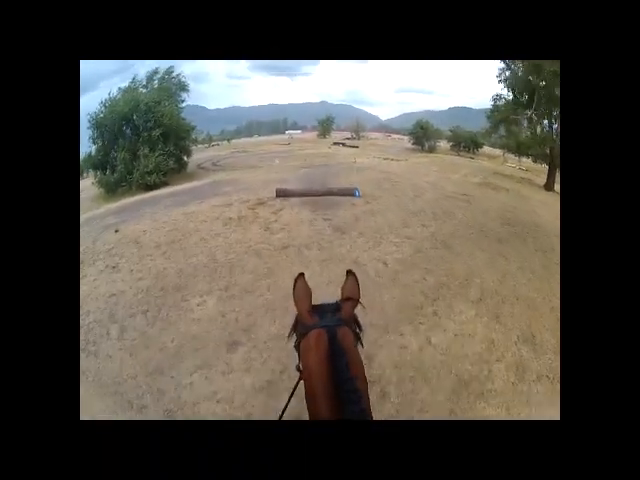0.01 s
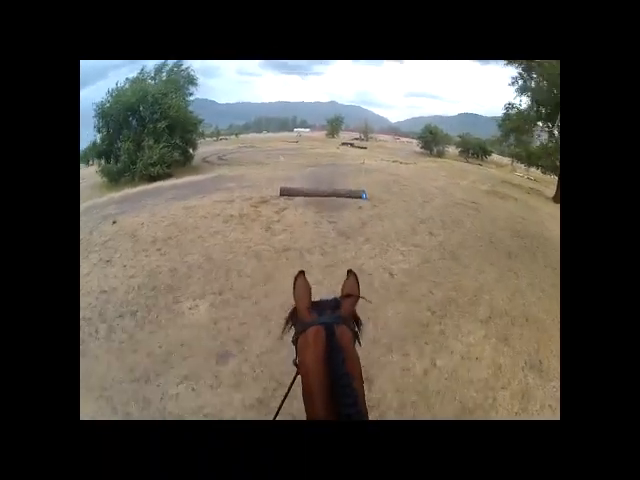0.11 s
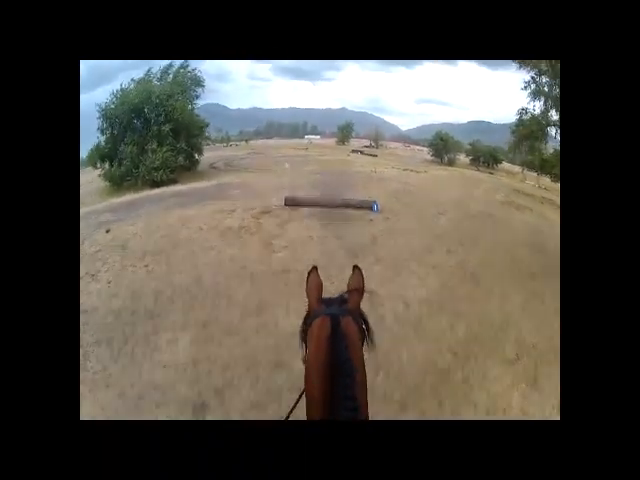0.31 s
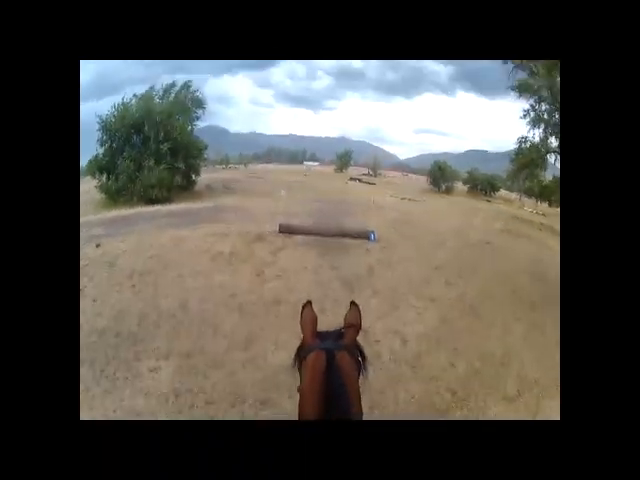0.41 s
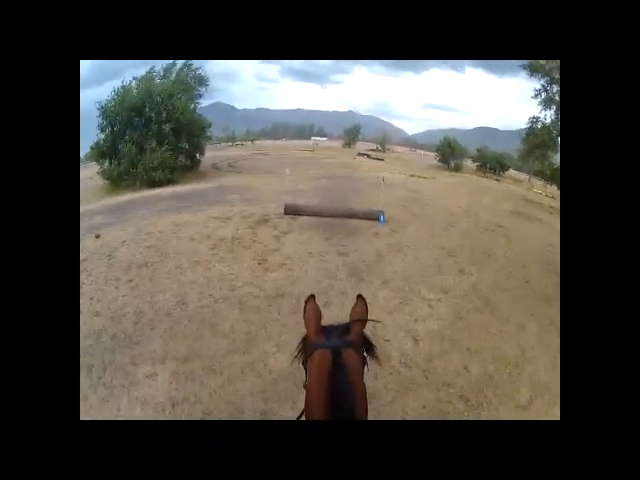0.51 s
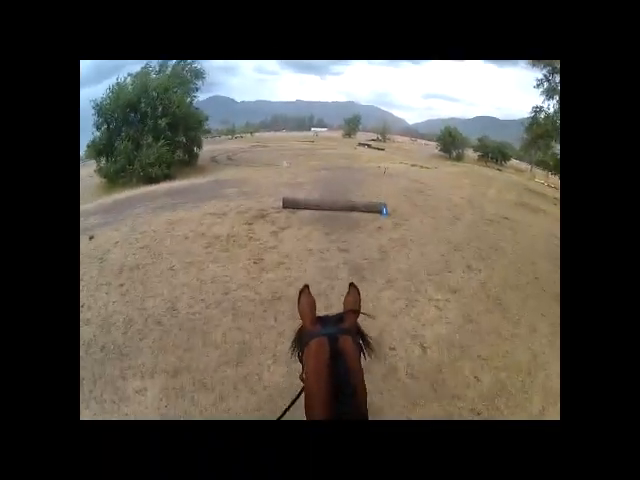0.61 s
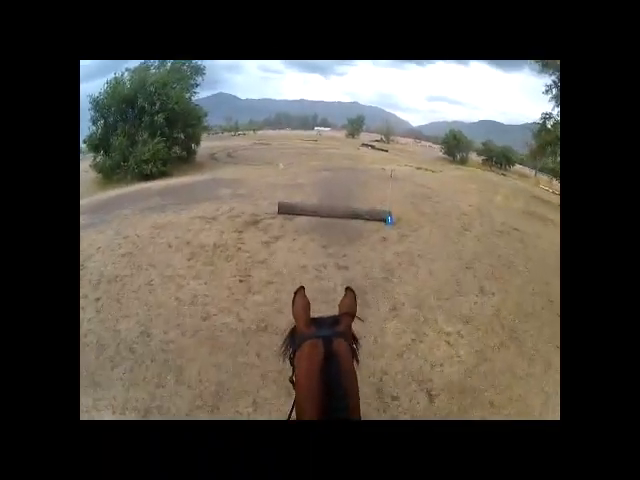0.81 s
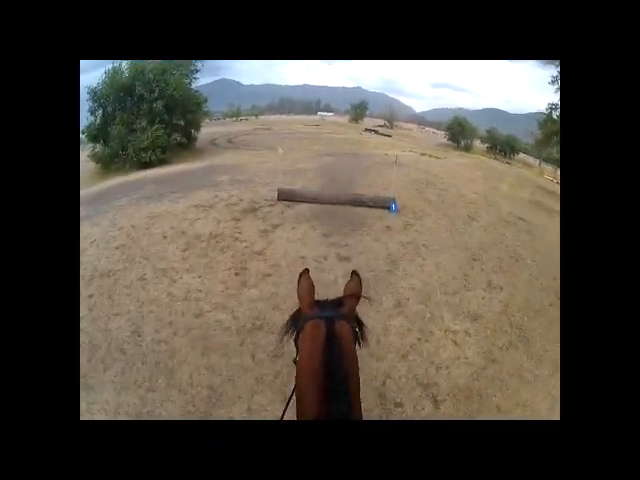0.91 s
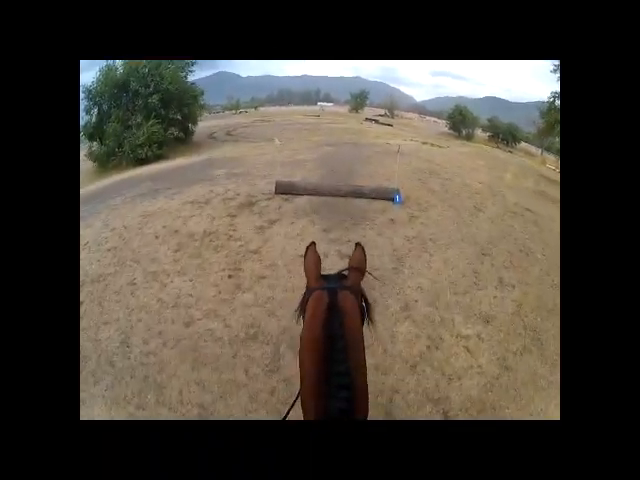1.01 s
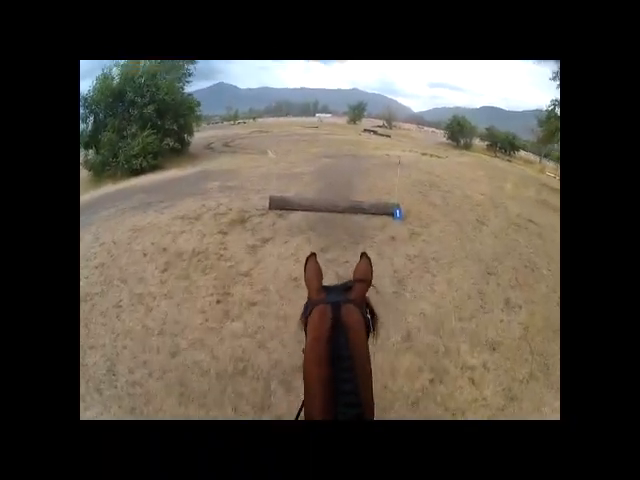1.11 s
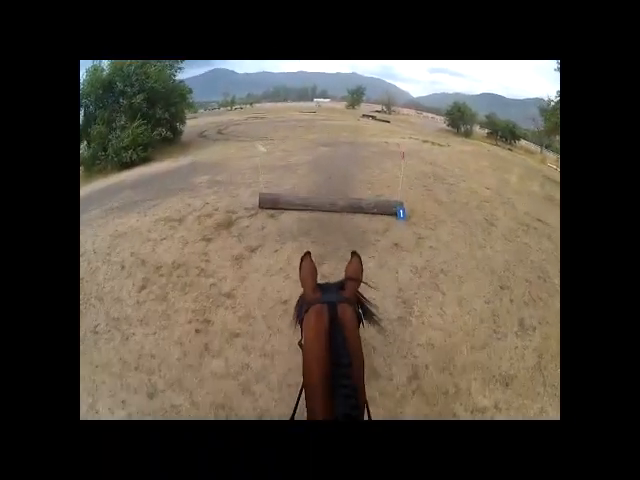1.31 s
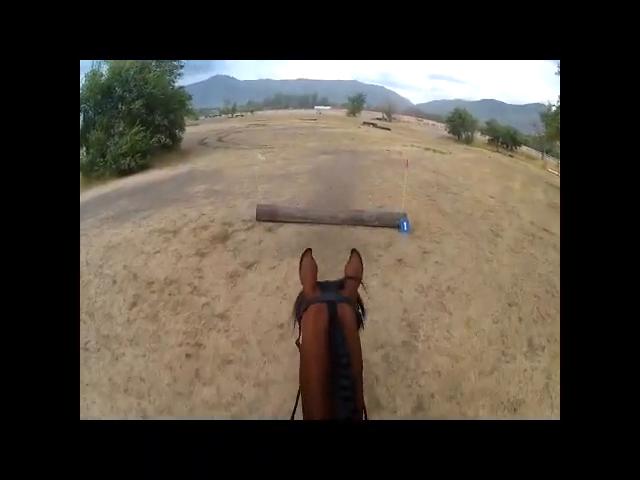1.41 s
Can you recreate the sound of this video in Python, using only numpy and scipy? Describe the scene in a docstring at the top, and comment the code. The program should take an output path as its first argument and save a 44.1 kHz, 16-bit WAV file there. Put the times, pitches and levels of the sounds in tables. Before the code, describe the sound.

From a microphone on the rider, a horse canters across an open dry field; two bursts of hard, woody hoofbeats with a soft step between, dry grit crunching, air heaving at the microphone, low wind and faint hiss.

```python
"""A horse canters over hard dry ground, heard from the saddle: two strides, with a softer footfall between.
Each stride is a cluster of hard, hollow knocks (struck damped modes) over dull thuds (damped low swings),
with short gritty scuffs of grainy friction noise.
Air heaves at the microphone as slow pressure pulses with every stride, over a low rumble of wind
and a faint hiss with a whine in it, all made from coloured noise."""
import sys
import numpy as np
from scipy import signal
from scipy.io import wavfile
from scipy.ndimage import uniform_filter1d

SR = 44100
rng = np.random.default_rng(int(sys.argv[2]) if len(sys.argv) > 2 else 0)


def master(y):
    """Save y as 16-bit WAV."""
    cut = np.clip(np.atleast_2d(y).T, -1, 1)
    pcm = np.round(cut * 32767)  # scale
    wavfile.write(sys.argv[1], SR, pcm.astype(np.int16))


N = 63945

# wind rumble over time: (time [s], level [dB])
WIND_LEVEL = [(0, -36), (.056, -31.5), (.19, -44), (.25, -39), (.33, -38), (.46, -30), (.53, -41),
              (.62, -44), (.72, -36), (.83, -33), (.93, -46), (1.0, -47), (1.1, -34), (1.2, -33),
              (1.27, -39), (1.37, -48), (1.45, -37)]
# relative spectral density of the rumble: (frequency [Hz], density [dB per Hz])
RUMBLE_COLOUR = [(10, -24), (22, -3.5), (33, -1), (47, -8), (65, -17.5), (100, -33.5), (200, -39.5),
                 (500, -62), (1500, -100)]
WIND_FADE_S = 0.012
# relative spectral density of the steady outdoor hiss: (frequency [Hz], density [dB per Hz])
HISS_COLOUR = [(30, 5), (120, 1.5), (250, -1.5), (400, -7), (700, -14.5), (1300, -18.5), (2500, -21.5),
               (4500, -25), (7000, -29), (10000, -33.5), (12500, -39)]
HISS_DB = -58.5
# narrow noise bands of the whine: (centre [Hz], width [Hz], level [dB])
WHINE_BANDS = [(5050, 120, -80.5), (6950, 99, -82)]

# gritty scuffs: (centre [s], relative level [dB], half length [s])
SCUFFS = [(0.1, -66.5, 0.042), (0.265, -44.5, 0.0038), (0.349, -54, 0.019), (0.394, -40.5, 0.0035),
          (0.422, -46.5, 0.0052), (.431, -37.5, 0.0065), (0.444, -47.5, 0.0056), (0.466, -63.5, 0.056),
          (0.66, -66.5, 0.018), (.732, -56, 0.017), (0.789, -63, 0.019), (0.816, -60.5, 0.0045),
          (1.052, -57, 0.011), (1.074, -57, 0.0025), (1.101, -55.5, 0.017), (1.144, -50.5, 0.011),
          (1.186, -68, 0.033), (1.228, -56.5, 0.002), (1.275, -68, 0.011)]
# relative spectral density of scuff noise: (frequency [Hz], density [dB per Hz])
GRIT_COLOUR = [(250, -19), (500, -3), (950, 5), (1500, -6.5), (2200, 2.5), (3400, -8), (5000, -20.5),
               (7000, -25.5), (9600, -12), (11500, -17), (12600, -27.5)]
GRAIN_DB, GRAIN_S = 4, 0.0005  # rms of the level flicker, and its smoothing time
CRUNCH_DB, CRUNCH_RISE_S, CRUNCH_DECAY_S = -19, 0.0005, 0.0028  # level relative to its knock

# dull thuds: (time [s], relative level [dB], pitch [Hz], 60 dB decay time [s], rise time [s])
THUDS = [(0.247, -2.5, 108.4, 0.017, 0.00071), (0.2626, -12, 114.7, 0.049, 0.00053),
         (0.34, -10, 110, 0.014, 0.00072), (.3560, -15.5, 101, 0.057, 0.0044),
         (0.3945, -15, 224, .025, .001), (0.3986, -3.5, 102, 0.042, .0006), (0.421, -3.5, 75, 0.02, .001),
         (0.4406, -2.5, 119, 0.022, 0.00017), (0.721, -26.5, 130, 0.12, 0.00042),
         (0.7332, -20, 107, 0.061, 0.00067), (1.0548, -5.5, 94.3, 0.028, 0.0008),
         (1.098, -15, 200, 0.017, 0.0007), (1.102, -12, 114, 0.054, 0.00097),
         (1.152, -23.5, 161.5, 0.039, 0.0013), (1.158, -15.5, 70.6, 0.041, 0.002)]
THUD_TOP_HZ = 356.4
THUD_ROUGH_DB, ROUGH_REACH = -11, 2.14  # rms level; upper limit as a multiple of the pitch

# hard knocks: (time [s], relative level [dB], pitch [ratio], brightness [dB per octave],
#               ring length [ratio], level of the top modes [dB])
KNOCKS = [(0.2472, -6.5, 0.95, 0, 0.74, -0.5), (0.2626, -16, 0.97, -2, 0.78, -0.8),
          (.3390, -20, 0.98, -8, 1, -2.5), (0.35, -37, 1.0, -4.5, 2.5, 0),
          (0.393, -17.5, 1.007, 0.5, 0.83, 1), (0.3964, -24.5, 1.0, 0.5, 1.82, 0.5),
          (0.424, -25.5, 1.08, -2, 1.6, -7), (0.429, -17.5, 0.9, -1, 1.47, -4),
          (.4385, -16.5, 0.75, -34, 0.35, -25), (0.442, -27.5, 1.146, -2, 0.78, 4),
          (0.721, -37, 0.85, -8, 0.59, -4), (0.732, -38, 1.047, -16, 1.6, 1),
          (1.0541, -11, 1.007, -1.8, 1.265, 0.5), (1.0991, -20, 1.158, 1.5, 1.14, 3.5)]
# hollow modes of a knock, before its ratios: (frequency [Hz], relative level [dB], time to peak [s])
KNOCK_MODES = [(757, -7, .00106), (943, 3, .00096), (1298, -13, .0014), (1750, -9.5, .00095),
               (2567, -24, .0012), (2771, -17, .0011), (3342, -31, .0011), (3692, -27, .001),
               (4250, -38, .0007), (4850, -39, .0007), (8329, -31, .00055), (9157, -30, .0009),
               (10220, -25, .0006), (11016, -18, .001)]
MAIN_MODE_HZ = KNOCK_MODES[1][0]
TOP_MODES_HZ = 6000
AFTER_RING_HZ, AFTER_RING_DB, AFTER_RING_S = 815, -20.5, 0.0014
RATTLE_DB, RATTLE_S = -14, 0.006  # energy relative to the blow; decay time
KNOCK_DB, KNOCK_LOW_HZ = -1, 546

# air heaves: (centre [s], level [dB], pitch [Hz], half length [s])
HEAVES = [(0.376, -16, 42.7, 0.019), (0.425, -18.5, 39, 0.0076), (0.765, -36, 34.56, 0.019),
          (1.08, -15.5, 34.2, 0.021), (1.155, -23.5, 30.1, 0.036)]

# microphone response: (frequency [Hz], gain [dB])
MIC_RESPONSE = [(20, 0.5), (3800, 2), (5100, -2), (5900, -8.5), (6500, -6.5), (7300, 0.5), (8500, 2.5),
                (11400, 2), (12300, 2)]
BAND_LIMIT_HZ = 12624


def amp(db):
    """Logarithmic level: converts decibels to an amplitude ratio."""
    return 10 ** (np.asarray(db) / 20)


def unit(x):
    """Normalisation: scales a signal to an rms of 1."""
    return x / np.sqrt(np.mean(x ** 2) + 1e-20)


def add(mix, start_s, sound):
    """Superposition: adds a sound into the mix, in place, from a given time."""
    part = mix[max(round(start_s * SR), 0):][:len(sound)]
    part += sound[:len(part)]


def colour(x, points):
    """Minimum-phase filtering: the log gain fixes the phase of a causal response."""
    table_hz, table_db = np.transpose(points)
    size = 16384
    hz = abs(np.fft.fftfreq(size, 1 / SR))
    gain_db = np.interp(np.log(hz + 1), np.log(table_hz + 1), table_db)
    log_spectrum = np.conj(signal.hilbert(np.log(amp(gain_db))))
    taps = np.fft.ifft(np.exp(log_spectrum)).real[:size // 2]
    return signal.fftconvolve(x, taps)[:len(x)]


def noise(points):
    """Spectral shaping: steady white noise takes a given colour, at an rms of 1."""
    white = rng.standard_normal(N + SR)
    return unit(colour(white, points)[SR:])  # the filter settles in the dropped second


def cut(x, hz, kind, order):
    """Butterworth filtering: a high-pass or low-pass with a flat passband."""
    return signal.sosfilt(signal.butter(order, hz, kind, fs=SR, output="sos"), x)


def wind_rumble():
    """Amplitude modulation: low-frequency noise follows the wind level, faded at both ends."""
    t = np.arange(N) / SR
    level = amp(np.interp(t, *np.transpose(WIND_LEVEL)))
    fade = np.minimum(np.minimum(t, t[::-1]) / WIND_FADE_S, 1)
    return fade * level * noise(RUMBLE_COLOUR)


def hiss():
    """Stationary broadband noise: a constant spectrum falling towards the treble."""
    return amp(HISS_DB) * noise(HISS_COLOUR)


def whine():
    """Heterodyning: slow noise multiplies a sine, giving a narrow band around its frequency."""
    t = np.arange(N) / SR
    out = np.zeros(N)
    for hz, width_hz, db in WHINE_BANDS:
        slow_noise = cut(rng.standard_normal(N), width_hz / 2, "low", order=2)
        out += amp(db) * unit(slow_noise * np.sin(2 * np.pi * hz * t))
    return out


def scuffs():
    """Granular friction: flickering noise swells, and crunches with each knock's force and brightness."""
    t = np.arange(N) / SR
    level = np.zeros(N)
    for centre_s, db, half_s in SCUFFS:
        level += amp(db) * np.exp(-0.5 * ((t - centre_s) / half_s) ** 4)  # flat-topped swell
    for start_s, db, _, bright_db, _, _ in KNOCKS:
        age = np.maximum(t - start_s, 0)
        crunch = (1 - np.exp(-age / CRUNCH_RISE_S)) * np.exp(-age / CRUNCH_DECAY_S)
        level += amp(CRUNCH_DB + db + 2 * bright_db) * crunch
    flicker = uniform_filter1d(rng.standard_normal(N), max(round(GRAIN_S * SR), 1))
    grains = amp(GRAIN_DB * unit(flicker))
    return level * unit(noise(GRIT_COLOUR) * grains)


def thud(db, hz, t60, rise_s):
    """Heavily damped oscillation: landing weight makes a low swing, roughened by low-passed noise."""
    t = np.arange(SR // 6) / SR
    rough_noise = cut(rng.standard_normal(len(t)), ROUGH_REACH * hz, "low", order=4)
    rough = amp(THUD_ROUGH_DB) * unit(rough_noise)
    rise = 1 - np.exp(-t / rise_s)
    decay = np.exp(-np.log(1000) * t / t60)
    swing = (rough - np.sin(2 * np.pi * hz * t)) * rise * decay
    return amp(db) * cut(swing, THUD_TOP_HZ, "low", order=5)


def knock(db, pitch, bright_db, ring, top_db):
    """Modal excitation: a blow with a brief rattle strikes modes that swell for about 1 ms and die."""
    t = np.arange(SR // 16) / SR
    body = np.zeros(len(t))
    for k, (hz, mode_db, peak_s) in enumerate(KNOCK_MODES):
        u = t / (peak_s * ring)
        tilt_db = top_db if hz > TOP_MODES_HZ else bright_db * np.log2(hz / MAIN_MODE_HZ)
        # above the main mode, every mode shifts by the same number of hertz
        shifted_hz = hz + (pitch - 1) * min(hz, MAIN_MODE_HZ)
        sign = (-1) ** k  # neighbouring modes start in opposite phase
        envelope = u * np.exp(1 - u)
        body += sign * amp(mode_db + tilt_db) * envelope * np.sin(2 * np.pi * shifted_hz * t)
    after_ring = np.exp(-t / AFTER_RING_S) * np.sin(2 * np.pi * AFTER_RING_HZ * t)
    body += amp(AFTER_RING_DB) * after_ring

    rattle = rng.standard_normal(len(t)) * np.exp(-t / RATTLE_S)
    blow = amp(RATTLE_DB) * rattle / np.linalg.norm(rattle)
    blow[0] += 1
    struck = signal.fftconvolve(blow, body)[:len(t)]
    return amp(KNOCK_DB + db) * cut(struck, KNOCK_LOW_HZ, "high", order=4)


def footfalls():
    """Linear superposition: every thud and knock that comes with a footfall adds at its own time."""
    out = np.zeros(N)
    for start_s, *settings in THUDS:
        add(out, start_s, thud(*settings))
    for start_s, *settings in KNOCKS:
        add(out, start_s, knock(*settings))
    return out


def air_heaves():
    """Pressure pulses: a negative low cosine under a Gaussian window moves the air slowly."""
    t = np.arange(N) / SR
    out = np.zeros(N)
    for centre_s, db, hz, half_s in HEAVES:
        age = t - centre_s
        window = np.exp(-0.5 * (age / half_s) ** 2)
        out -= amp(db) * window * np.cos(2 * np.pi * hz * age)
    return out


def scene():
    """Superposition at one point: wind, scuffs, footfalls and heaves share one channel."""
    wind = wind_rumble() + hiss() + whine()
    return (wind + scuffs() + footfalls() + air_heaves())[None]


def record(dry):
    """Linear response: microphone colour with a hollow in the treble, then a band limit."""
    band_limit = signal.firwin(255, BAND_LIMIT_HZ, window=("kaiser", 8), fs=SR)
    return np.array([signal.fftconvolve(colour(x, MIC_RESPONSE), band_limit, "same") for x in dry])


dry = scene()
out = record(dry)
master(out)
```